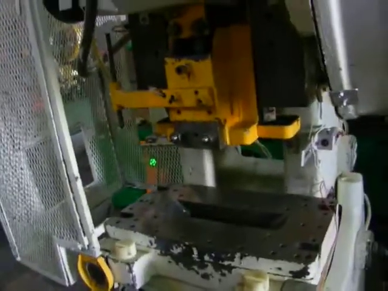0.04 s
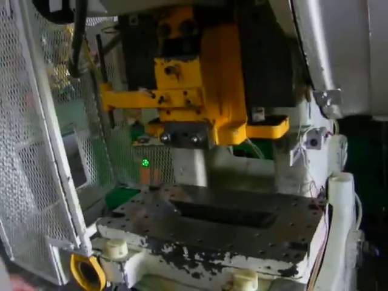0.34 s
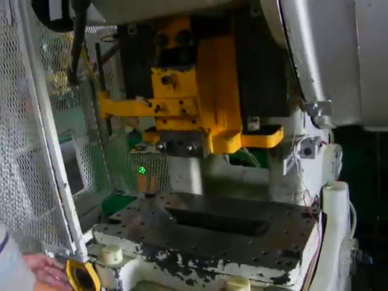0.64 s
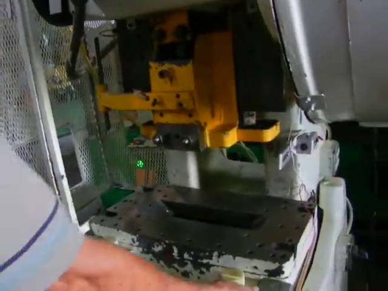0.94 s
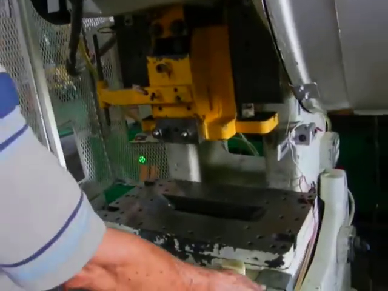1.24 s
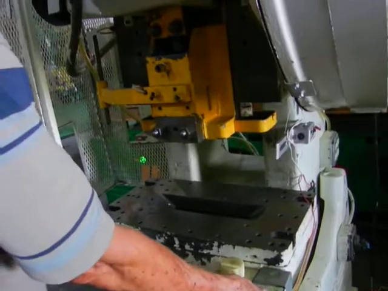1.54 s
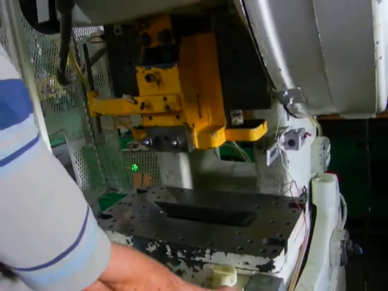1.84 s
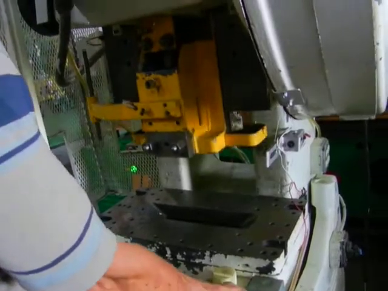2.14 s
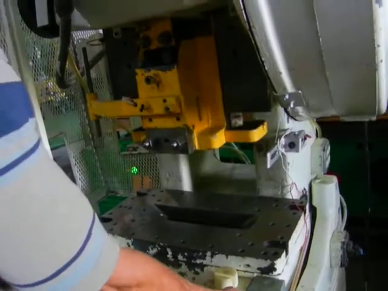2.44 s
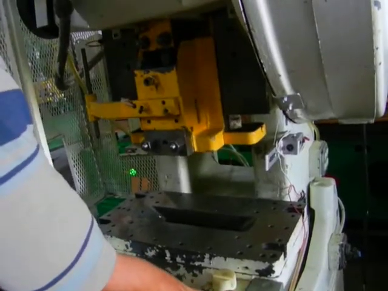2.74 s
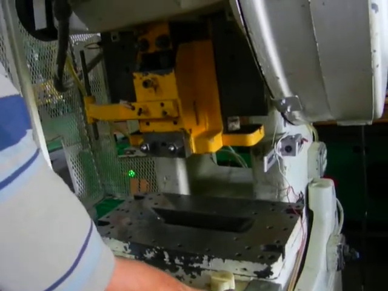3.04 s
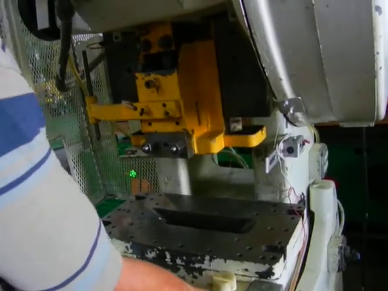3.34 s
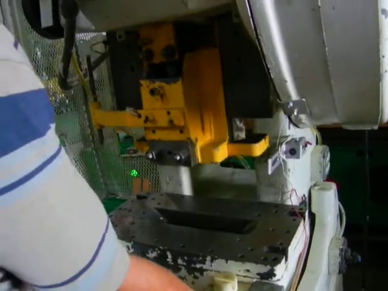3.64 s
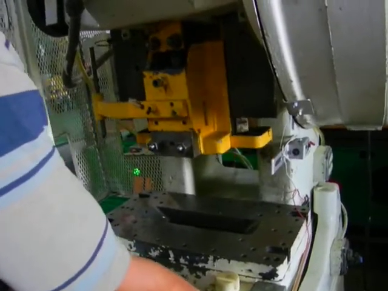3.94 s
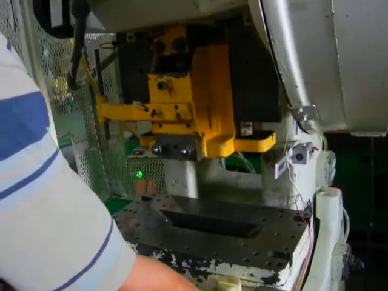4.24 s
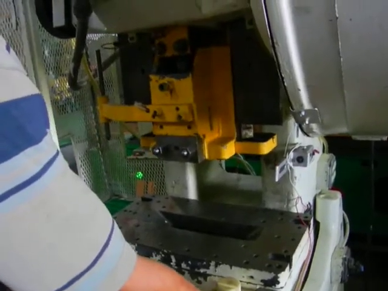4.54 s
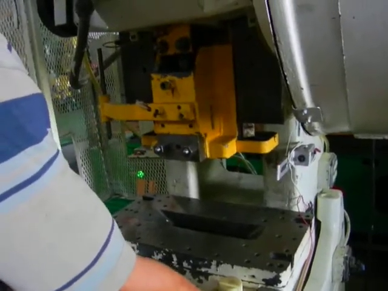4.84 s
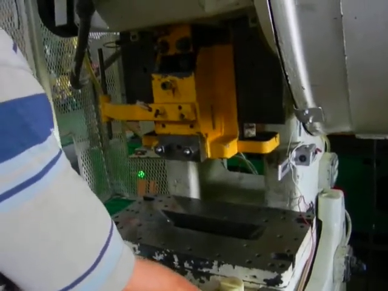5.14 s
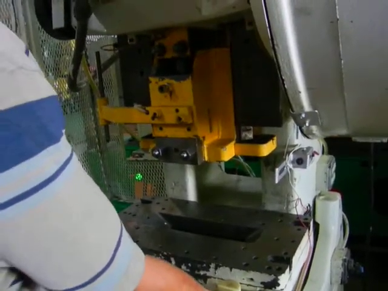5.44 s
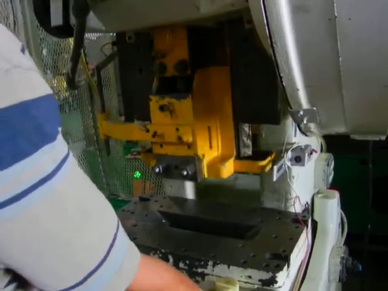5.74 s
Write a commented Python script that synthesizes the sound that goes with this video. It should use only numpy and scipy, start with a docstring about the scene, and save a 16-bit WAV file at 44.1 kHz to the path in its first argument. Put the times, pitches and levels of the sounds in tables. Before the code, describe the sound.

A punch press idles in a workshop with a steady motor hum, flywheel roar and faint hiss that comes and goes. It then makes three strokes about two seconds apart. Each starts with a ringing metal slam, grinds briefly, and stops with a sharp puff of air and a knock. The blows echo in the hall, and the nearby microphone's level dips at each one before the hum swells back.

```python
"""A punch press makes three single strokes in a workshop. In each, a valve ticks, the clutch slams in
and rings the frame, and the gears grind. Then the brake bites with a puff of air and the drive knocks.
The blows echo in the press housing and the hall. Behind them the motor hums, the flywheel roars and
a far hiss comes and goes. The camera's gain control turns everything down at each loud blow,
then lets the hum swell back slowly."""
import sys
import numpy as np
from scipy import signal
from scipy.fft import rfft, irfft, next_fast_len
from scipy.io import wavfile
from scipy.ndimage import uniform_filter1d, map_coordinates

SR = 44100
rng = np.random.default_rng(int(sys.argv[2]) if len(sys.argv) > 2 else 0)


def to_wav(s):
    """Save 16-bit WAV."""
    ch = np.atleast_2d(s).T  # columns
    pcm = np.round(np.clip(ch, -1, 1) * 32767)  # PCM
    wavfile.write(sys.argv[1], SR, pcm.astype(np.int16))


N = 264159
TIME = np.arange(N) / SR
AGE = np.arange(SR) / SR  # seconds since a blow

# A "colour" says how strong a noise's low and high pitches are compared with each other.
# colour of the far hiss: pitch_hz, level_db
HISS_COLOUR = [(1500, -30), (2700, 1), (3100, 5.5), (3600, -1.5), (4250, 3), (4900, -5), (5500, -0.5),
               (6400, -7), (7600, -15), (16000, -20)]
# swells of the far hiss: peak_s, level_db
HISS_SWELLS = [(.11, -35.5), (1.0, -42), (1.24, -39), (1.43, -36)]
# colour of the flywheel and workshop roar: pitch_hz, level_db
ROAR_COLOUR = [(25, -22), (48, -11), (62, -8), (110, 2.5), (270, -2.5), (370, -0.5), (630, 1), (1000, -6),
               (1800, -10.5), (2900, -17.5), (3600, -23), (6000, -27.5), (7600, -30), (16000, -33)]
# the motor's magnetic hum: multiple_of_hum_pitch, level_db
HUM_TONES = [(1, -22), (3, -37), (4, -45), (5, -36.5)]
# whine of the running drive: pitch_hz, level_db
WHINE_TONES = [(175, -47.5), (221, -45), (394, -49), (436, -65), (689, -39), (1103.5, -40), (2206, -53.5),
               (2848, -54), (3311, -58.5), (7821, -60), (8182, -58)]
# colour of the grinding gears: pitch_hz, level_db
GEAR_COLOUR = [(50, -45), (150, -6), (400, -10), (800, -12), (1350, 1), (1620, -7), (1800, 6.5), (2100, -5),
               (2650, -16), (3150, -17), (3900, -13.5), (6000, -25), (9000, -28), (16000, -25)]
# colour of the brake's puff of air: pitch_hz, level_db
PUFF_COLOUR = [(100, -0.5), (600, 8), (1000, -1), (1800, 4), (3000, -1.5), (4500, -6), (6000, -1),
               (8000, -6.5), (11300, -1.5), (16000, -6.5)]
# colour of the air draining away: pitch_hz, level_db
DRAIN_COLOUR = [(300, 13), (1000, 7.5), (2500, 0.5), (4000, -3), (5900, -2), (7800, -5.5), (11300, -6),
                (16000, -16)]
# thump of the released air: pitch_hz, level_db, fade_s
THUMP_TONES = [(178, 0.5, 0.029), (76, -21, 0.038), (255, -2, 0.023)]
# ring of the drive as its slack runs out: pitch_hz, level_db, fade_s
KNOCK_TONES = [(586, -4.5, 0.13), (658, 2, 0.09), (800, -13, 0.13), (882, -4.5, 0.088), (1035, -9, 0.08),
               (1447, -14, 0.12)]
# colour of the drive's knocks and rattle: pitch_hz, level_db
KNOCK_COLOUR = [(100, -15), (400, 0.5), (800, 6.5), (1500, 0.5), (2300, -4.5), (3500, -27), (8000, -40),
                (16000, -25)]
# ticks of a loose linkage ahead of a stroke: start_s, level_db
LINKAGE_TICKS = [(3.479, -17), (5.4254, -15)]
# colour of the linkage and valve ticks: pitch_hz, level_db
TICK_COLOUR = [(150, 3), (600, -7), (2800, 1), (4200, -8.5), (7000, -16.5), (16000, -17)]
# colour of the clutch's crack: pitch_hz, level_db
CRACK_COLOUR = [(200, -11.5), (700, 0.5), (1500, -5.5), (2900, -3), (3800, -13.5), (5600, -15),
                (7700, -22.5), (11500, -16), (16000, -15.5)]
# ring of the frame when the clutch hits: pitch_hz, level_db, fade_s
FRAME_TONES = [(94, -12, 0.073), (162.3, -17, 0.1), (248, -10.5, 0.045), (402, -5.5, 0.038),
               (664, -14, 0.072), (1002, -6.5, 0.06), (1830, -11.5, 0.059), (2152, -12.5, 0.047),
               (2430, -5, 0.016), (2710, -17.5, 0.026)]
# ring of the bolster, struck by a second blow just after the first: pitch_hz, level_db, fade_s
BOLSTER_TONES = [(1003, -17, 0.098), (1567, -2, 0.048), (1664, -14.5, 0.1)]
# strokes of the press: clutch_s, brake_s, slam_db, thump_db
STROKES = [(1.7878, 2.133, 28, 26.5), (3.511, 3.8845, 30.5, 23), (5.4859, 5.873, 32, 27.5)]
# echo inside the press housing: pitch_hz, fade_s
HOUSING_FADES = [(100, 0.29), (1000, 0.3), (2500, 0.24), (6000, 0.26), (15000, 0.11)]
# echo of the hall: pitch_hz, fade_s
HALL_FADES = [(100, 2.78), (1000, 1.9), (5500, 1.58), (10000, 0.78), (15000, 0.41)]
# colour of both echoes: pitch_hz, level_db
ECHO_COLOUR = [(60, -11), (200, -1.5), (450, -3), (900, -2), (1600, -2.5), (3000, 0), (6000, 0.5),
               (16000, 1.5)]
# how alike a noise is on the left and right: pitch_hz, likeness (1 is the same)
STEREO_LIKENESS = [(30, 0.27), (80, 0.92), (1000, 0.94), (2200, 0.87), (4500, 0.76), (9000, 0.31),
                   (15000, 0.061)]
# which side the background leans to: pitch_hz, left_minus_right_db
BACKGROUND_BALANCE = [(60, -2.5), (120, -2.7), (380, -1), (1290, .5), (4400, 2), (8100, 4), (12000, -1),
                      (15000, -.5)]
# which side the press leans to: pitch_hz, left_minus_right_db
PRESS_BALANCE = [(60, -2), (110, -4), (200, -3.5), (380, -2.0), (700, 0.5), (1290, 0.5), (2380, 1.5),
                 (4400, 1.5), (8120, 4), (15000, -3)]

HUM_HZ, CASING_HZ, TOP_HZ = 120, 1664, 16000
HISS_FLOOR_DB, HISS_RISE_DB_PER_S, HISS_FALL_DB_PER_S = -60, 77, 38
AIR_DB = 19  # every stop lets out the same charge of air
SLACK_S, KNOCK_DB, REBOUND_S, REBOUND_LOSS_DB = 0.0345, 8, 0.016, 2


def amp(db):
    """Turn decibels into a number to multiply by."""
    return 10 ** (np.asarray(db) / 20)


def look_up(table, hz):
    """Read a table at any pitch, sliding between its rows on a log scale."""
    pitches, values = np.transpose(table)
    return np.interp(np.log(hz + 1), np.log(pitches), values)


def wobble(rate):
    """A smooth curve through `rate` random values a second."""
    return map_coordinates(rng.standard_normal(int(N * rate / SR) + 4), [TIME * rate])


def filtered(x, gain_at):
    """Multiply each pitch in x by gain_at(hz)."""
    size = x.shape[-1]
    padded = next_fast_len(size + 8192)
    return irfft(rfft(x, padded) * gain_at(np.fft.rfftfreq(padded, 1 / SR)), padded)[..., :size]


def noise(colour, size):
    """Stereo noise of average power 1; left and right differ most in the high treble."""
    def gain_at(hz):
        spread = np.arccos(np.clip(look_up(STEREO_LIKENESS, hz), -1, 1)) / 2
        return amp(look_up(colour, hz)) * [np.cos(spread), np.sin(spread)]
    middle, side = filtered(rng.standard_normal((2, size)), gain_at)
    stereo = np.array([middle + side, middle - side])
    return stereo / np.sqrt(np.mean(stereo ** 2) + 1e-20)


def placed(x, balance):
    """Lean each pitch to the left or right."""
    return filtered(x, lambda hz: amp(np.outer([0.5, -0.5], look_up(balance, hz))))


def fade(fade_s, rise_s):
    """The loudness of a blow: a rounded start, and a fall of 60 dB in fade_s."""
    return np.exp(-np.log(1000) * AGE / fade_s) * (1 - np.exp(-(AGE / rise_s) ** 2))


def burst(colour, fade_s, rise_s):
    """A dying puff of noise."""
    return noise(colour, len(AGE)) * fade(fade_s, rise_s)


def ring(tones, rise_s):
    """A struck part's fading tones, every other one flipped; their strengths vary from blow to blow."""
    strengths = amp(0.5 * rng.standard_normal(len(tones)))
    return sum((-1) ** (k + 1) * strengths[k] * amp(db) * fade(fade_s, rise_s)
               * np.sin(2 * np.pi * hz * AGE) for k, (hz, db, fade_s) in enumerate(tones))


def add(track, start_s, sound):
    """Mix a sound into the track at start_s."""
    part = track[:, round(start_s * SR):][:, :len(AGE)]
    part += sound[..., :part.shape[1]]


def echo(x, fades, rise_s):
    """A wash of reflections builds up, then each pitch dies at its own speed."""
    hz, t, spectrum = signal.stft(noise(ECHO_COLOUR, SR), SR, nperseg=256)
    shape = np.exp(-np.log(1000) * t / look_up(fades, hz)[:, None]) * (1 - np.exp(-t / rise_s))
    _, tail = signal.istft(spectrum * shape, SR, nperseg=256)
    return signal.fftconvolve(x, tail / np.linalg.norm(tail[0]), axes=1)[:, :N]


def far_hiss():
    """A faint steady hiss with swells that rise quickly and ebb more slowly."""
    swells_db = [db - np.maximum(HISS_RISE_DB_PER_S * (peak_s - TIME),
                                 HISS_FALL_DB_PER_S * (TIME - peak_s)) for peak_s, db in HISS_SWELLS]
    power = amp(HISS_FLOOR_DB) ** 2 + np.sum(amp(swells_db) ** 2, axis=0)
    return noise(HISS_COLOUR, N) * np.sqrt(power)


def idling_drive():
    """The motor hums, the drive whines and the flywheel roars, all wavering a little."""
    lead_rad = np.array([[0.25], [-0.25]])  # standing waves put left and right out of step
    hum = sum(amp(db) * np.sin(2 * np.pi * (multiple * HUM_HZ * TIME + rng.random()) + lead_rad)
              for multiple, db in HUM_TONES)
    hum *= amp(0.4 * wobble(5.4))
    whine = sum(amp(db + 1.9 * wobble(5.64)) * np.sin(2 * np.pi * hz * TIME + 0.86 * wobble(8))
                for hz, db in WHINE_TONES)
    roar = noise(ROAR_COLOUR, N) * amp(-24.5 + 0.51 * wobble(11))
    return np.sqrt(2) * (hum + whine) + roar


def gears():
    """From clutch to brake the gears grind, and their teeth shake the casing so that it rings."""
    running = sum(np.clip((TIME - clutch_s) / 0.024, 0, 1)
                  * np.exp(-np.maximum(TIME - brake_s, 0) / 0.034) for clutch_s, brake_s, _, _ in STROKES)
    phase = 2 * np.pi * CASING_HZ * TIME
    casing = amp(-21) * (wobble(110) * np.sin(phase) + wobble(110) * np.cos(phase))
    grind = amp(-14.5 + 2.3 * wobble(30)) * noise(GEAR_COLOUR, N)
    return running * (casing + grind)


def brake():
    """Released air puffs, thumps and drains away; the drive runs out of slack, knocks and rebounds."""
    track = np.zeros((2, N))
    for _, brake_s, _, thump_db in STROKES:
        # a backwards burst: the flow swells as the valve opens
        opening = burst(PUFF_COLOUR, fade_s=0.076, rise_s=0.00082)[:, ::-1]
        add(track, brake_s + 0.003 - AGE[-1], amp(AIR_DB - 13.5) * opening)
        add(track, brake_s, amp(AIR_DB) * burst(PUFF_COLOUR, fade_s=0.068, rise_s=0.0031))
        add(track, brake_s, amp(thump_db) * ring(THUMP_TONES, rise_s=0.0019))
        add(track, brake_s, amp(AIR_DB - 24.5) * burst(DRAIN_COLOUR, fade_s=0.94, rise_s=0.0065))
        for bounce in range(2):
            clack = amp(-2) * burst(KNOCK_COLOUR, fade_s=0.087, rise_s=0.00028)
            knock = clack + ring(KNOCK_TONES, rise_s=0.0019)
            knock_s = brake_s + SLACK_S + bounce * REBOUND_S
            add(track, knock_s, amp(KNOCK_DB - bounce * REBOUND_LOSS_DB) * knock)
    return track


def clutch():
    """Linkage and valve tick; the plates slam together, ring the frame and rattle the slack drive."""
    track = np.zeros((2, N))
    for start_s, level_db in LINKAGE_TICKS:
        add(track, start_s, amp(level_db) * burst(TICK_COLOUR, fade_s=0.074, rise_s=0.00048))
    for clutch_s, _, slam_db, _ in STROKES:
        valve_tick = amp(-17) * burst(TICK_COLOUR, fade_s=0.14, rise_s=0.00034)
        add(track, clutch_s - 0.015, valve_tick)
        crack = amp(-7) * burst(CRACK_COLOUR, fade_s=0.08, rise_s=0.0015)
        add(track, clutch_s - 0.0006, amp(slam_db) * (crack + ring(FRAME_TONES, rise_s=0.0013)))
        add(track, clutch_s + 0.00347, amp(slam_db) * ring(BOLSTER_TONES, rise_s=0.00069))
        rattle = amp(-20) * burst(KNOCK_COLOUR, fade_s=0.36, rise_s=0.025)
        flutter = amp(1.1 * wobble(176)[:len(AGE)])
        add(track, clutch_s + 0.0042, amp(slam_db) * rattle * flutter)
    return track


def scene():
    """The press's blows, their echoes and its gears, over the idling drive and the far hiss."""
    # the deep bass of the blows is cut, as the microphone would cut it
    bass_cut = signal.butter(1, 55, "highpass", fs=SR)
    blows = signal.lfilter(*bass_cut, clutch() + brake())
    housing = amp(-12) * echo(blows, HOUSING_FADES, rise_s=0.015)
    hall = amp(-16) * echo(blows, HALL_FADES, rise_s=0.02)
    press = placed(blows + housing + hall + gears(), PRESS_BALANCE)
    return press + placed(idling_drive() + far_hiss(), BACKGROUND_BALANCE)


def gain_control(x, limit_db, recover_db_per_s, treble_weight):
    """The volume drops at once when the sound passes the limit, then climbs slowly back."""
    treble = treble_weight * np.diff(x, prepend=0)
    power = np.mean(x ** 2 + treble ** 2, axis=0)
    smooth_power = signal.lfilter(np.ones(140) / 140, 1, power)  # averaged over about 3 ms
    excess_db = np.maximum(10 * np.log10(smooth_power + 1e-12) - limit_db, 0)
    recovery_db = recover_db_per_s * TIME
    cut_db = np.maximum.accumulate(excess_db + recovery_db) - recovery_db
    return x * amp(-uniform_filter1d(cut_db, size=50, origin=-20))


def record(dry):
    """The camera turns loud blows down, rounds off their peaks and drops the highest treble."""
    ducked = gain_control(dry, limit_db=-4.5, recover_db_per_s=16.5, treble_weight=2.12)
    rounded = ducked / (1 + ducked ** 6) ** (1 / 6)
    return filtered(rounded, lambda hz: hz < TOP_HZ)


dry = scene()
out = record(dry)
to_wav(out)
```